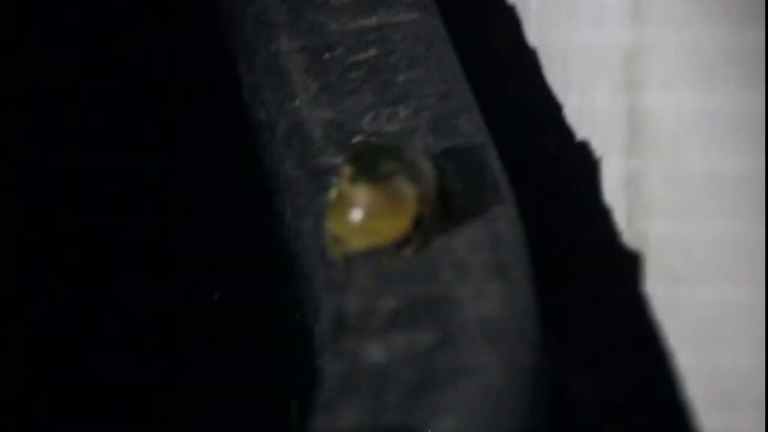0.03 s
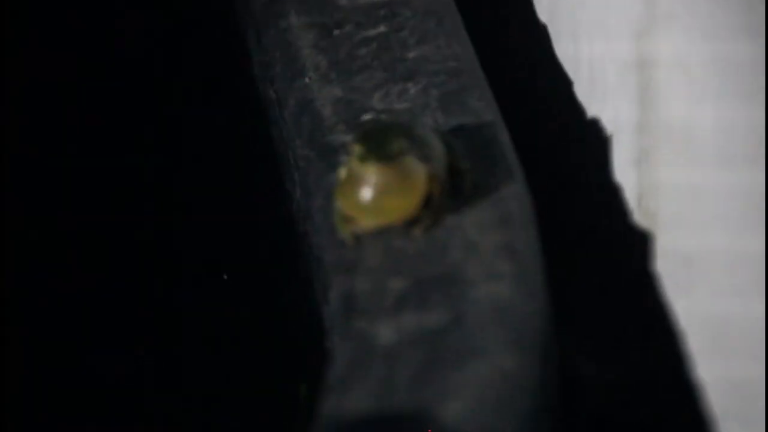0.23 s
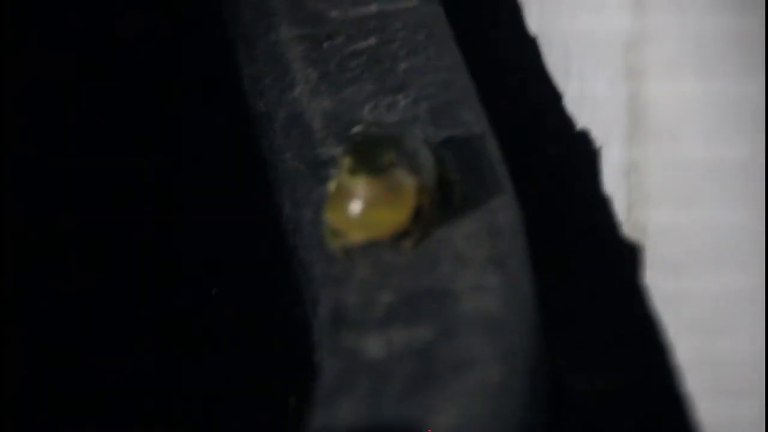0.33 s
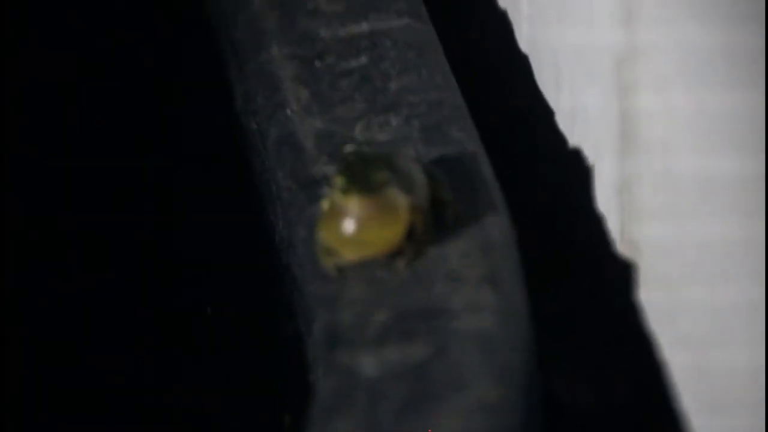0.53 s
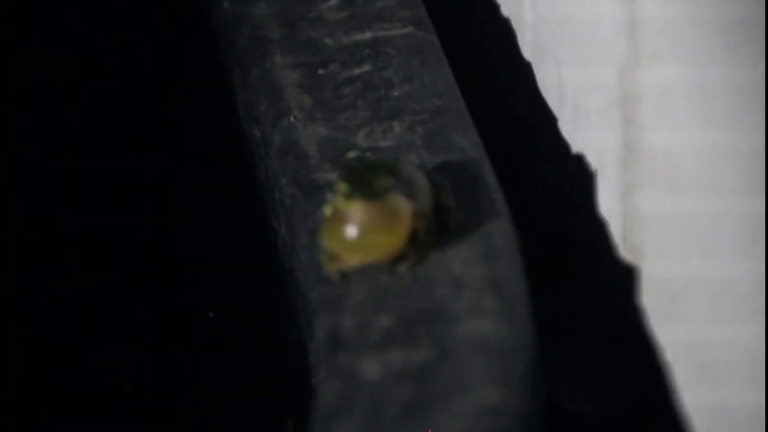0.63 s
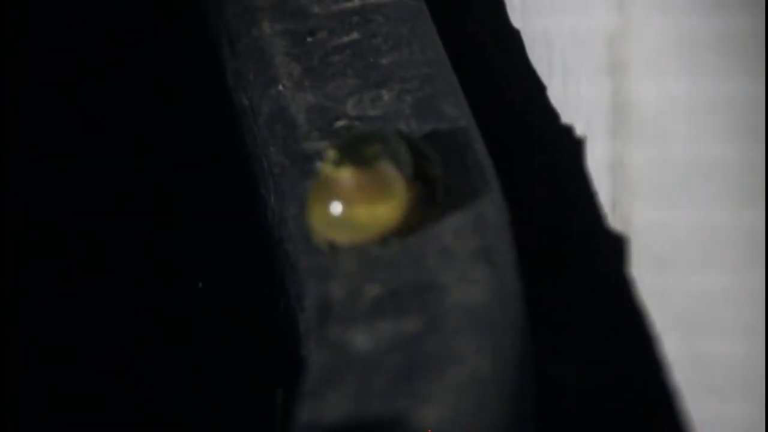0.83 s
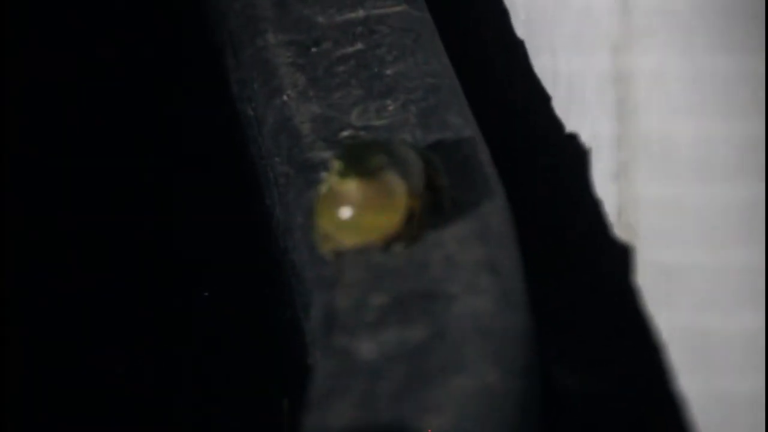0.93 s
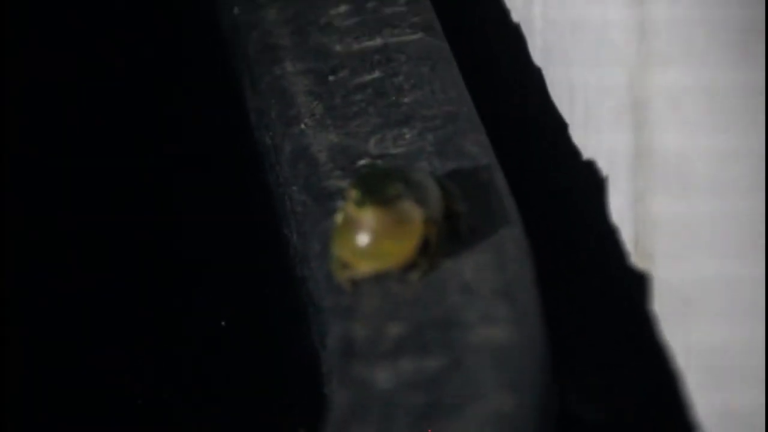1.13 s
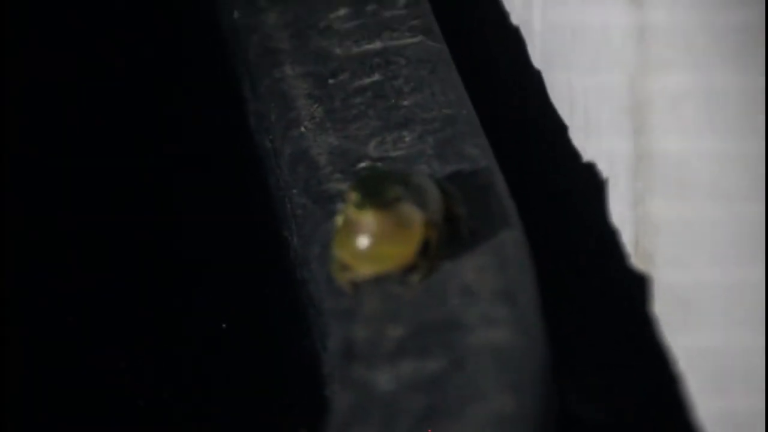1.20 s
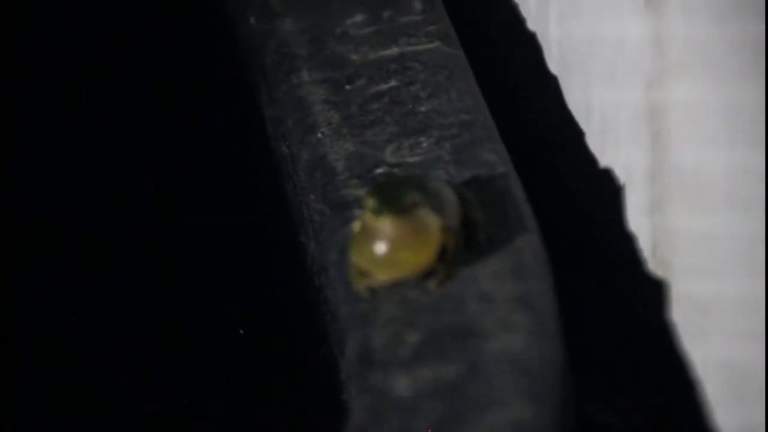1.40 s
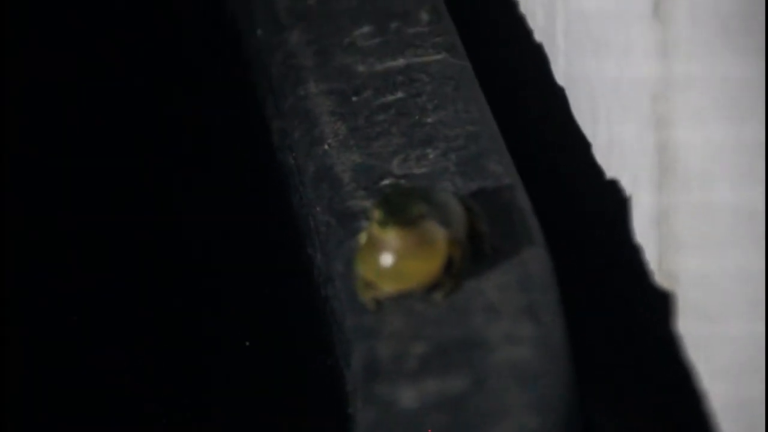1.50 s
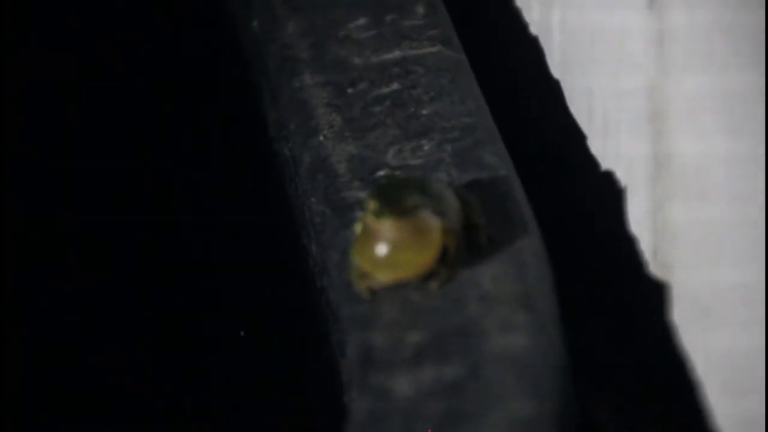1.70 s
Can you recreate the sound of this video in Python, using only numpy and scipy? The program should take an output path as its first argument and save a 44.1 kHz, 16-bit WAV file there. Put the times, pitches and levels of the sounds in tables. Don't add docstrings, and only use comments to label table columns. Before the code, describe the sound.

A small tree frog croaks once, a loud rattling burst and a shorter softer one, close to the microphone in a boarded yard at night, over low distant traffic drone, faint insects and hiss.

```python
import sys
import numpy as np
from scipy import signal
from scipy.io import wavfile

SR = 44100
rng = np.random.default_rng(int(sys.argv[2]) if len(sys.argv) > 2 else 0)


def volts_from_db(level):
    exponent = np.asarray(level, float) / 20
    return 10 ** exponent


def dump_mix(stems):
    frames = np.atleast_2d(stems).T
    limited = np.clip(frames, -1, 1)
    pcm = np.round(limited * 32767).astype(np.int16)
    wavfile.write(sys.argv[1], SR, pcm)


N = 77175

# time in seconds, level in dB, centre of the note in Hz.
TRAFFIC_DRONE = [(0.09, -33.5, 128.9), (0.116, -28.5, 113.4), (0.19, -30.5, 101.5), (0.224, -24, 115.5),
                 (0.242, -29, 119.5), (0.366, -23, 120.3), (0.398, -28, 129.6), (0.458, -26.5, 106),
                 (0.75, -27, 100.7), (0.778, -41.5, 109.6), (0.908, -45, 114.3), (1.028, -35.5, 110.4),
                 (1.158, -38.5, 108.3), (1.264, -29.5, 116), (1.346, -29, 102.9), (1.656, -30.5, 117),
                 (1.722, -37.5, 124), (1.75, -26, 140.6)]
# frequency in Hz, density in dB per Hz.
TRAFFIC_RUMBLE = [(12, -58), (20, -16.5), (59, -4.5), (125, -1), (175, -9), (203, -22.5), (400, -29),
                  (520, -66.5), (880, -120)]
# frequency in Hz, density in dB per Hz.
NIGHT_AIR = [(120, -31.5), (200, 1), (385, -11), (454, -8), (715, -25), (874, -22.5), (1050, -21),
             (3300, -37.5), (15500, -48)]
# centre in Hz, width in Hz, level in dB.
FAR_BANDS = [
    (900, 120, -52.5),
    (1300, 82, -56),
    (1890, 140, -62.5),
    (4480, 90, -74.5),
]
# time in seconds, gain in dB.
RECORDER_GAIN = [
    (0, -1.5),
    (.1, 1),
    (.745, 0.5),
    (.78, -12),
    (.86, -8.5),
    (.95, -14),
    (1.18, -5.5),
    (1.33, 0),
    (1.75, 1.5),
]
# start in seconds, note in Hz, level in dB, decay by 60 dB in seconds.
SAC_HUMS = [
    (.808, 1632, -30.5, .15),
    (0.906, 1698, -30, 0.24),
]
# multiple of the note, level in dB.
HUM_PARTIALS = [(1, -6.5), (2, -9.5), (3, -20.5), (4, -35.5), (6, -32.5)]
# start in seconds, peak in dB, sac note in Hz, upper note in Hz, hold in ms.
THROAT_PULSES = [(0.7111, -30, 1650, 3040, .2), (0.7266, -5.5, 1700, 2980, 1), (0.7369, 0, 1550, 2880, 1.7),
                 (0.7474, 3.5, 1606, 3110, 1.3), (0.7583, 2, 1639, 3176, 0.88),
                 (0.7689, -1, 1598, 3282, 1.9), (.7798, 1.5, 1602, 3200, 1.8), (0.7907, 0, 1637, 3235, 2.7),
                 (0.8019, -3.5, 1632, 3302, 1.7), (0.8674, -1.5, 1656, 3359, 2.42),
                 (0.878, -4, 1679, 3410, 2.4), (0.8884, -7, 1646, 3367, 3.7),
                 (0.9014, -13, 1653, 3417, 4.3)]
# multiple, level in dB.
UPPER_OVERTONES = [(3, -31), (4, -30), (5, -40), (6, -41), (7, -51), (8, -51)]
# centre in seconds, length in seconds, lower edge in Hz, depth in dB.
TREBLE_LOSSES = [
    (.558, .012, 4000, -20),
    (1.2, .017, 2400, -32),
]

DRONE_WIDTH_HZ, DRONE_TONE_DB, DRONE_BED_DB = 24, -3.5, 0.5
NIGHT_DB = -38.5
EARLY_HZ, EARLY_DB, EARLY_BED_DB, WHINE_HZ, WHINE_DB = 159, -24, -36, 2000, 13
RUSTLE_S, RUSTLE_LEN_S, RUSTLE_DB, RUSTLE_HZ = .82, .03, -39, 870
BOARD_S, BOARD_DB = .0036, -16
NEAR_DB, NEAR_T60_S, FAR_DB, FAR_T60_S, YARD_CUT_HZ = -25, .16, -41, .6, 7000
ONSET_MS, ROUNDNESS_MS = .35, .5
SWELL_DB_PER_MS, RELEASE_DB_PER_MS, RELEASE_BEND = 2.0, 5.5, .45
SAC_DB, SAC_LONGER_MS, SAC_SAG, UPPER_RISE = -6.5, 1, .03, 0.035
SIDE_HZ, SIDE_DB, SIDE_MS = 2673, -10, 0.4145
SNAP_DB, SNAP_MS, SNAP_CUT_HZ = -29, 1.0, 7000
AIR_DB, AIR_HZ, AIR_DB_PER_KHZ = -48, 12000, 30
PEAK_LIMIT = .92
FADE_S, BREAK_S, BACK_S, BACK_LEN_S, BREAK_DB = 0.021, 0.05, 0.062, 0.042, -52
BASS_CUT_HZ, CUTOFF_HZ = 38, 16200


def rms_one(x):
    return x / np.sqrt(np.mean(x ** 2) + 1e-20)


def in_time(rows):
    s, *columns = np.transpose(rows)
    return [np.interp(np.arange(N) / SR, s, c) for c in columns]


def drift(rate_hz):
    r = np.exp(-2 * np.pi * rate_hz / SR)
    white = rng.standard_normal(N + SR)
    return rms_one(signal.lfilter([1], [1, -2 * r, r * r], white)[SR:])


def narrow(phase, width_hz):
    return rms_one(drift(width_hz) * np.cos(phase) + drift(width_hz) * np.sin(phase))


def banded_noise(spectrum, patchy_db):
    out, together = 0, drift(5.1)
    hz, density_db = np.transpose(spectrum)
    edges = np.geomspace(max(hz[0], 15), min(hz[-1] * 1.25, .45 * SR), 21)
    white = rng.standard_normal((2, N + SR))
    for k, (low, high) in enumerate(zip(edges, edges[1:])):
        band_pass = signal.butter(2, [low, high], "band", fs=SR, output="sos")
        band = signal.sosfilt(band_pass, white[k % 2])[SR:]
        level_db = np.interp(np.log(low * high) / 2, np.log(hz), density_db)
        flicker_db = patchy_db * (0.82 * together + drift(8.2))
        out = out + volts_from_db(level_db + flicker_db) * band
    return rms_one(out)


def traffic():
    level_db, hz = in_time(TRAFFIC_DRONE)
    t = np.arange(N) / SR
    note = narrow(2 * np.pi * np.cumsum(hz) / SR, DRONE_WIDTH_HZ)
    bed = banded_noise(TRAFFIC_RUMBLE, patchy_db=2.5)
    early = volts_from_db(EARLY_DB) * np.cos(2 * np.pi * EARLY_HZ * t) + volts_from_db(EARLY_BED_DB) * bed
    late = volts_from_db(level_db) * (volts_from_db(DRONE_TONE_DB) * note + volts_from_db(DRONE_BED_DB) * bed)
    return np.where(t < BREAK_S, early, late)


def chorus():
    t = np.arange(N) / SR
    out = 0
    for hz, width_hz, db in FAR_BANDS:
        whine_db = WHINE_DB * (t < BREAK_S) * (abs(hz - WHINE_HZ) < 500)
        level = volts_from_db(db + 3 * drift(3.7) + whine_db)
        out = out + level * narrow(2 * np.pi * hz * t, width_hz)
    return out


def night():
    gain_db, = in_time(RECORDER_GAIN)
    return volts_from_db(gain_db) * (volts_from_db(NIGHT_DB) * banded_noise(NIGHT_AIR, patchy_db=0.39) + chorus())


def yard(x):
    t = np.arange(SR) / SR
    near = volts_from_db(NEAR_DB - 60 * t / NEAR_T60_S) * rng.standard_normal(SR)
    far = volts_from_db(FAR_DB - 60 * t / FAR_T60_S) * rng.standard_normal(SR)
    dull = signal.butter(1, YARD_CUT_HZ, fs=SR, output="sos")
    tail = signal.sosfilt(dull, (near + far) * np.minimum(t / .005, 1)) / 10
    tail[int(BOARD_S * SR)] += volts_from_db(BOARD_DB)
    return signal.fftconvolve(x, tail)[:N]


def rustle():
    t = np.arange(N) / SR
    air = narrow(2 * np.pi * RUSTLE_HZ * t, 140.0) + narrow(2 * np.pi * 1.6 * RUSTLE_HZ * t, 260.0)
    return volts_from_db(RUSTLE_DB) * air * np.exp(-((t - RUSTLE_S) / RUSTLE_LEN_S) ** 2)


def hum():
    out, t = 0, np.arange(N) / SR
    for s, hz, db, t60 in SAC_HUMS:
        since = np.maximum(t - s, 0)
        onset = np.minimum(since / .006, 1)
        for k, level_db in HUM_PARTIALS:
            decay_db = 60 * since / t60 * (1 + 0.22 * abs(k - 2))
            partial = narrow(2 * np.pi * k * hz * t, 30.0 * k)
            out = out + volts_from_db(db + level_db - decay_db) * onset * partial
    return out


def swell(t, hold_ms):
    late = 1000 * t - hold_ms
    over = ROUNDNESS_MS * np.logaddexp(0, late / ROUNDNESS_MS)
    release_db = (RELEASE_DB_PER_MS + RELEASE_BEND * over) * over
    attack = 1 - np.exp(-(1000 * t / ONSET_MS) ** 2)
    return volts_from_db(SWELL_DB_PER_MS * (late - over) - release_db) * attack


def croak():
    out, t = np.zeros(N), np.arange(1024) / SR
    puff_band = signal.butter(3, [2000, SNAP_CUT_HZ], "band", fs=SR, output="sos")
    puffs = signal.sosfilt(puff_band, rng.standard_normal((len(THROAT_PULSES), len(t))))
    settle = np.exp(-t / 0.0022)
    for (s, db, sac_hz, upper_hz, ms), puff in zip(THROAT_PULSES, puffs):
        puff = rms_one(puff)
        opening = swell(t, ms)
        low = 2 * np.pi * np.cumsum(sac_hz * (1 + SAC_SAG * (settle - t / 0.0044))) / SR
        half = np.pi * np.cumsum(upper_hz * (1 - UPPER_RISE * (settle - .3))) / SR
        x = opening * np.sin(2 * half)
        x += volts_from_db(SAC_DB) * swell(t, ms + SAC_LONGER_MS) * np.sin(low)
        x += volts_from_db(SIDE_DB) * swell(t, SIDE_MS) * np.sin(2 * np.pi * SIDE_HZ * t)
        bright_db = AIR_DB_PER_KHZ * (upper_hz - 3200) / 1000
        for k, level_db in UPPER_OVERTONES:
            dim_db = min(bright_db, 0) * (k > 4)
            x += volts_from_db(level_db + dim_db + db / 3) * opening ** 1.3 * np.sin(k * half)
        x += volts_from_db(SNAP_DB) * swell(t, SNAP_MS * min(ms, 1.5)) * puff
        x += volts_from_db(AIR_DB + bright_db) * opening * puff * np.sin(2 * np.pi * AIR_HZ * t)
        i = int(s * SR)
        out[i:i + len(t)] += min(volts_from_db(db), PEAK_LIMIT) * x / np.abs(x).max()
    return out


def scene():
    frog = croak()
    return (frog + yard(frog) + hum() + rustle() + traffic() + night())[None]


def roll_off(x):
    return signal.sosfilt(signal.butter(12, 16450, fs=SR, output="sos"), x)


def record(dry):
    t = np.arange(N) / SR
    fade = 1 - 1.1 * np.clip((t - FADE_S) / (BREAK_S - FADE_S), 0, 1)
    back = volts_from_db(BREAK_DB) + np.sin(np.pi / 2 * np.clip((t - BACK_S) / BACK_LEN_S, 0, 1)) ** 2
    x = signal.sosfilt(signal.butter(2, BASS_CUT_HZ, "high", fs=SR, output="sos"), dry)
    x = x * np.where(t < BREAK_S, fade, back)
    for s, length, hz, db in TREBLE_LOSSES:
        low = signal.sosfiltfilt(signal.butter(6, hz, fs=SR, output="sos"), x)
        x = low + (x - low) * volts_from_db(db * np.exp(-(2 * (t - s) / length) ** 4))
    x = signal.sosfilt(signal.ellip(14, .5, 80, CUTOFF_HZ, fs=SR, output="sos"), x)
    return roll_off(x)


dry = scene()
out = record(dry)
dump_mix(out)
```